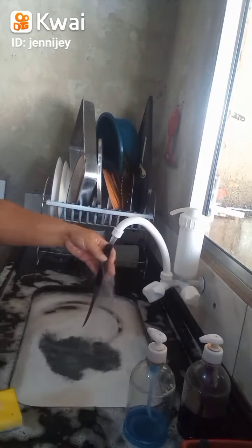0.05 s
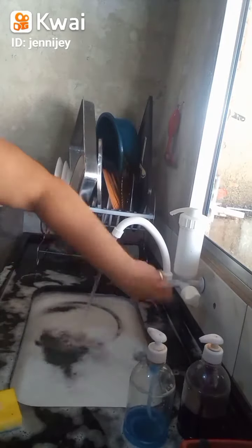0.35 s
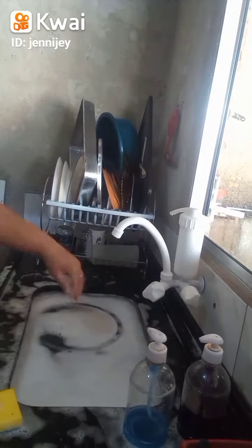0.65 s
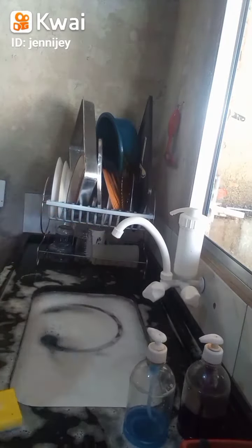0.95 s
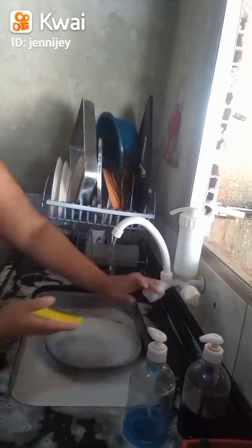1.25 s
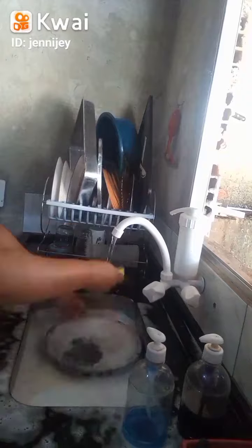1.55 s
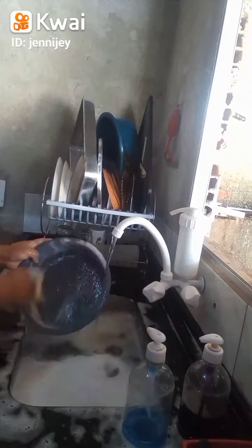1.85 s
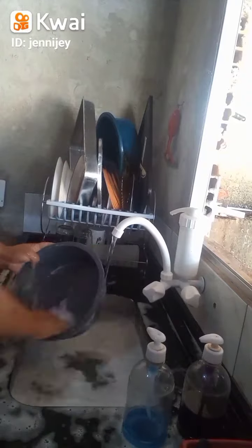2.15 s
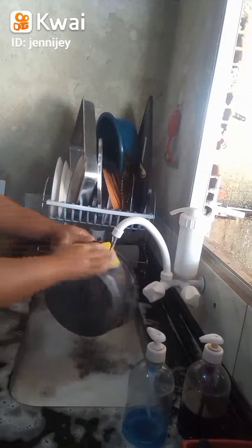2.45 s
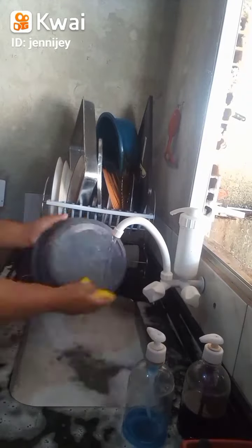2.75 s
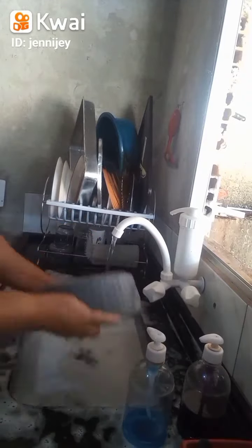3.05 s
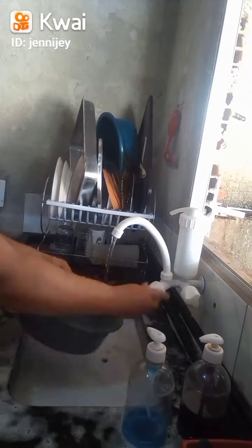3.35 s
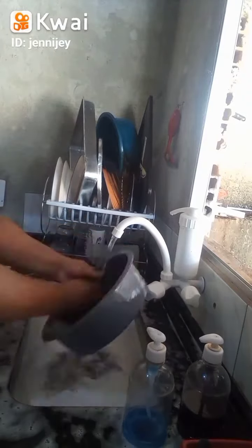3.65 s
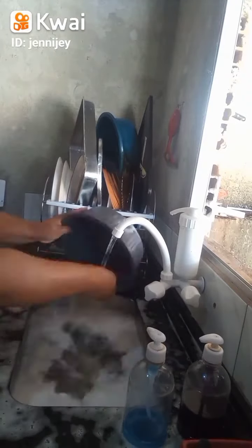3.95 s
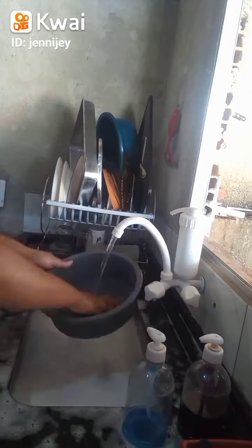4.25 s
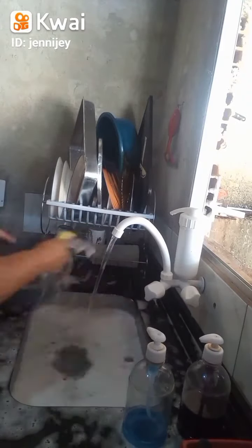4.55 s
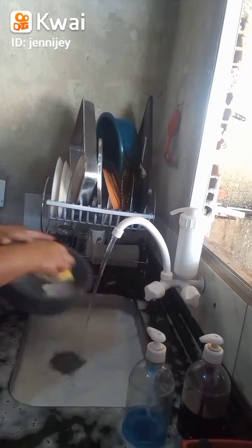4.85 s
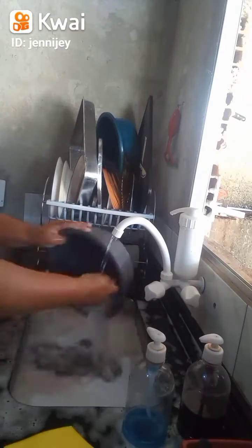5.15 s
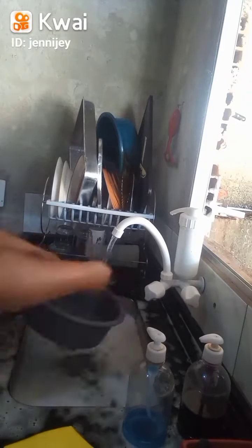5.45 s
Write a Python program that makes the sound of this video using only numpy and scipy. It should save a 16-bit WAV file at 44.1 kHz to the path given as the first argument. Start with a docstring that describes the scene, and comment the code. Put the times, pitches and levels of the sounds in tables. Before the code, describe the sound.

Close up at a kitchen sink, tap water runs and a knife clacks once. The tap shuts with a soft judder, and a plastic basin bumps into the sink. The water spurts back on and the basin is washed by hand: the stream sprays, gurgles and drums unevenly, with splashing handfuls, small plops, ticking drops and dull bumps.

```python
"""At a kitchen sink, a plastic basin is washed by hand under the tap, heard close up.
The stream sprays, gurgles and drums; handfuls of water splash down and drops tick. The water is
modelled as trapped air bubbles, each a damped oscillator, over the noise of froth.
Early on a knife clacks once, and the tap judders shut for a moment while the basin bumps into
the sink; these struck bodies ring in their normal modes."""
import sys
import numpy as np
from scipy import signal
from scipy.fft import rfft, irfft, next_fast_len
from scipy.io import wavfile
from scipy.ndimage import uniform_filter1d, map_coordinates

SR = 44100
rng = np.random.default_rng(int(sys.argv[2]) if len(sys.argv) > 2 else 0)


def wav_record(signal):
    """Record a signal, one row per channel, as 16-bit PCM in the file named by sys.argv[1]."""
    frames = np.transpose(np.atleast_2d(signal))
    bounded = np.clip(frames, -1, 1)
    # unit amplitude maps onto the largest positive 16-bit level
    quanta = np.round(bounded * 32767).astype(np.int16)
    wavfile.write(sys.argv[1], SR, quanta)


N = 250929
TIME = np.arange(N) / SR
HIT = np.arange(SR // 6) / SR  # time since a contact [s]

# Noise spectra: (frequency [Hz], relative spectral level [dB])
ROOM_SPECTRUM = [(50, -10.5), (140, -1.5), (400, -14), (2000, -26.5), (7500, -26)]  # the kitchen at rest
RUMBLE_SPECTRUM = [(25, -7.5), (45, -8.5), (80, -1.5), (115, -2), (170, -9)]
HISS_SPECTRUM = [(8500, -5.5), (11500, -6), (13300, 0.5), (14200, -10)]
SPURT_SPECTRUM = [(530, -58), (900, -28), (1180, -31), (1520, -16), (2690, -4), (6170, -4), (7800, -11),
                  (10100, -41), (17200, -120)]  # the tap opening
SPRAY_SPECTRUM = [(500, -35), (1200, -5.5), (1500, -7), (2050, 0), (2500, 1), (2950, -1), (3900, -1),
                  (4700, -5), (5400, -2), (5950, -1), (6700, -4), (7400, -10), (8000, -19)]  # fine droplets
GURGLE_SPECTRUM = [(200, -14), (380, -4), (520, -1), (780, -1), (920, -7), (1080, -5), (1230, -3),
                   (1450, -10), (1900, -10), (3000, -9)]  # pooled water
DRUM_SPECTRUM = [(20, -15), (45, -19), (80, -8.5), (125, -0.5), (200, 0), (300, -3), (420, -3),
                 (700, -27.5)]  # water pounding basin and sink
SLOSH_SPECTRUM = [(150, 5), (400, 2.5), (700, -2.5), (1300, -5.5), (2400, -12), (5000, -16.5), (7500, -22)]  # handfuls landing
# Envelopes: (time [s], relative level [dB])
RUMBLE_LEVELS = [(0, -66), (.5, -79.5), (.95, -60.5), (1.4, -71.5), (2.7, -66.5), (3.05, -62),
                 (4.15, -76.5), (4.55, -66.5), (5.0, -80), (5.69, -63)]
JET_LEVELS = [(0, -49.5), (.14, -47), (.44, -60.5), (.6, -54.5), (.71, -80), (1.0, -84.5), (1.07, -62.5),
              (1.26, -63), (1.33, -60), (1.6, -58.5), (1.97, -50), (2.55, -53.5), (2.87, -49),
              (3.08, -59.5), (3.3, -63), (3.78, -48.5), (4.08, -52.5), (4.33, -50), (4.85, -54.5),
              (5.14, -51.5), (5.42, -56.5), (5.69, -51.5)]  # the tap shuts near 0.7 s and opens again
# Contacts of solid bodies: (time [s], relative level [dB])
TAP_CONTACTS = [(.59, -48), (.604, -45), (.621, -43), (.642, -40.5), (.653, -38), (.667, -37), (.68, -40)]
BASIN_CONTACTS = [(.8358, -22), (.8425, -28.5), (.8475, -30.5), (.862, -33.5)]
KNIFE_CONTACTS = [(.2332, -24), (.2345, -13), (.2382, -19), (.2415, -24)]
# Normal modes: (frequency [Hz], relative level [dB], 60 dB decay time [s])
PIPE_MODES = [(172, -2.5, 0.061), (350, -8, 0.054), (470, -3, 0.05), (665, -11.5, .05)]
SINK_MODES = [(111, -10.5, 0.086), (185, -7, 0.094), (255, -1, 0.037), (342, 2.5, 0.032), (506, -5, 0.059),
              (677, -11, 0.045), (800, -12, 0.042), (1120, -28, 0.037), (1350, -38.5, .04),
              (1570, -24, 0.045)]
KNIFE_MODES = [(296, -23.5, 0.022), (440, -11.5, 0.052), (1260, -17.5, 0.051), (1850, -15, 0.045),
               (1920, -10.5, 0.019), (2760, -16, 0.023), (3270, -18, 0.026), (3910, -14, 0.023),
               (4340, -6.5, 0.022), (4660, -7, 0.021), (5440, -17, 0.035), (6000, -7.5, .025),
               (6370, -16, 0.03), (6920, -7, 0.018)]
# Single resonances: (time [s], relative level [dB], frequency [Hz])
BASIN_BUMPS = [(1.574, -36, 186), (1.62, -30.5, 350), (1.741, -29.5, 212), (1.944, -29, 262),
               (2.04, -29, 253), (2.597, -30, 332), (3.923, -25.5, 293), (3.971, -32, 196),
               (4.45, -32.5, 215), (4.611, -24.5, 261), (5.217, -36, 199)]  # hands and water on the basin
AIR_POCKETS = [(.103, -33.5, 791), (.159, -43, 1110), (1.622, -39.5, 568), (1.801, -36, 640),
               (1.82, -42, 1100), (1.91, -32, 790), (1.977, -36, 423), (2.046, -32, 493), (2.118, -36, 720),
               (2.227, -33.5, 930), (2.327, -34, 1220), (2.342, -33.5, 786), (2.423, -36.5, 703),
               (2.976, -38.5, 1010), (3.133, -37.5, 765), (3.179, -39.5, 930), (3.221, -43.5, 729),
               (3.291, -42, 1210), (3.504, -37, 515), (3.621, -28, 784), (3.81, -33.5, 1220),
               (4.109, -41.5, 890), (4.223, -25.5, 588), (4.551, -32, 536), (4.577, -30, 685),
               (4.709, -35, 754), (5.216, -37.5, 597), (5.342, -36.5, 1220)]  # large bubbles closing
# A thin squirt as the hand reaches the tap: (time [s], frequency [Hz], level [dB])
SQUIRT_GLIDE = [(0.444, 870, -69), (0.46, 1000, -52), (.468, 1150, -63), (.484, 1040, -52),
                (0.493, 1405, -46), (.498, 2000, -49), (.505, 2500, -56), (.512, 2600, -78)]
# Drops hitting hard: (time [s], smack level [dB], frequency [Hz], ring over smack [dB])
DROP_IMPACTS = [(0.0333, -45.5, 2410, 14), (0.374, -38.5, 6330, 15), (1.4697, -49, 2050, 3),
                (1.9297, -41.5, 4020, 16), (2.0867, -38, 1876, 6), (2.7703, -48, 3920, 19),
                (2.825, -50, 2410, 23.5), (2.944, -50, 2330, 21), (2.9779, -45.5, 2300, -7),
                (3.321, -53, 5200, 15), (3.3436, -56.5, 2030, 17.5), (3.4386, -49.5, 5870, 6),
                (4.0112, -40, 2700, -8), (4.1774, -45.5, 2250, 0), (4.279, -47, 2070, 0),
                (4.2954, -43, 5700, 14), (4.7088, -48.5, 3790, 16), (5.016, -45, 2150, 0),
                (5.0662, -51.5, 3600, 24), (5.2175, -43.5, 1594, 11), (5.296, -49, 3460, 18),
                (5.3424, -42.5, 1850, 10), (5.436, -45.5, 3920, 16.5), (5.5054, -42.5, 5870, 15),
                (5.6, -45.5, 2600, 2)]
# Handfuls landing: (peak time [s], rise width [s], spray level [dB], slosh level [dB])
HANDFULS = [(.07, 0.0049, -36.5, -37), (.219, 0.0054, -40, -47), (0.28, 0.0044, -40, -60),
            (.32, 0.006, -43.5, -45), (.352, 0.0067, -47, -52), (0.395, 0.0049, -46, -59),
            (0.535, 0.0078, -38.5, -72), (0.672, 0.0052, -42, -45), (.748, 0.005, -68, -77),
            (.826, 0.0041, -63, -74), (.87, 0.0043, -47, -50), (.938, 0.0049, -59, -73),
            (1.046, 0.0048, -55, -78.5), (1.141, 0.0072, -49.5, -58), (1.188, 0.0059, -45, -56),
            (1.649, 0.0067, -38, -45), (2.001, 0.0041, -40.5, -48), (2.12, 0.0052, -62, -41),
            (2.168, 0.016, -42.5, -51), (2.3, 0.017, -41, -63), (2.464, 0.0041, -38, -60),
            (2.512, .005, -48, -62), (2.603, 0.0057, -43, -44.5), (2.66, 0.017, -45.5, -63),
            (3.041, 0.0074, -47, -75), (3.407, 0.0072, -53, -47), (3.511, 0.0048, -46, -44.5),
            (3.68, 0.011, -44, -52), (3.952, 0.0063, -44.5, -42.5), (4.233, 0.0041, -42, -44),
            (4.429, 0.01, -40, -44.5), (4.573, 0.0052, -40, -36.5), (5.066, 0.0087, -46.5, -50.5),
            (5.299, 0.0047, -45, -63), (5.555, 0.0046, -42.5, -50), (5.645, .013, -43, -47)]
# Sheets pouring off the tilted basin: (start [s], length [s], gurgle level [dB], drum level [dB])
POURED_SHEETS = [(0.039, 0.051, -49.5, -51), (0.306, 0.12, -55.5, -58), (1.372, 0.17, -53.5, -59),
                 (1.585, 0.15, -59, -54), (1.729, 0.11, -46.5, -51), (1.888, .16, -46.5, -49.5),
                 (2.075, .08, -50.5, -60), (2.241, 0.21, -51.5, -52), (2.595, 0.1, -49.5, -54),
                 (2.715, 0.23, -51.5, -51.5), (3.116, 0.25, -59.5, -67), (3.481, 0.051, -61, -50),
                 (3.657, 0.201, -50.5, -57), (3.914, .085, -56.5, -48), (4.386, .1, -49, -49),
                 (4.555, .325, -50, -50), (5.05, 0.064, -52.5, -71), (5.165, 0.058, -50, -56.5),
                 (5.31, 0.077, -56, -61), (5.612, 0.046, -46.5, -64)]
# A hand or the sponge catches the stream: (time [s])
CATCH_TIMES = [.264, .298, .635, 1.255, 1.57, 1.975, 2.06, 2.44, 2.565, 3.09, 3.275, 3.37, 3.622, 3.737,
               4.085, 4.16, 4.69, 4.92, 5.037, 5.272, 5.405, 5.585]


def amp(db):
    """The decibel scale: 20 dB is a factor of ten in amplitude."""
    return 10 ** (np.asarray(db) / 20)


def unit(x):
    """Normalisation to rms 1."""
    return x / np.sqrt(np.mean(x ** 2) + 1e-20)


def filtered(x, response):
    """Linear filtering: the spectrum is multiplied by a frequency response."""
    size = next_fast_len(len(x) + SR // 4)
    return irfft(rfft(x, size) * response(np.fft.rfftfreq(size, 1 / SR)), size)[:len(x)]


def coloured(x, spectrum):
    """Spectral shaping on a log frequency axis, falling away beyond the table's ends; rms 1."""
    knots, db = np.transpose([(spectrum[0][0] / 2, -60), *spectrum, (spectrum[-1][0] * 2, -90)])
    return unit(filtered(x, lambda hz: amp(np.interp(np.log(hz + 1), np.log(knots), db))))


def noise(spectrum, size=N):
    """Source and filter: white noise takes on the given spectrum."""
    return coloured(rng.standard_normal(size), spectrum)


def wobble(rate):
    """Random modulation: a smooth curve through `rate` random values a second."""
    return map_coordinates(rng.standard_normal(int(N * rate / SR) + 4), [TIME * rate])


def fade(t, t60):
    """Exponential damping: 60 dB of decay in t60."""
    return np.exp(-np.log(1000) * t / t60)


def add(track, start, sound):
    """Superposition: a sound joins the track at start [s]."""
    part = track[max(round(start * SR), 0):][:len(sound)]
    part += sound[:len(part)]


def resonance(t, hz, cycles, rise, onset_cycles):
    """A damped oscillator, 60 dB down after `cycles`; `rise` lifts the pitch, as in a surfacing bubble."""
    age = t * hz / cycles
    phase = 2 * np.pi * hz * t * (1 + rise * np.minimum(age, 2) / 2)
    return np.sin(phase) * fade(age, 1) * (1 - np.exp(-t * hz / onset_cycles))


def smack(hz, octaves, t60):
    """A brief wet impact has a broad spectrum: decaying noise centred on hz."""
    hump = lambda f: 1 / (1 + (np.log2((f + 1) / hz) / octaves) ** 2)
    return unit(filtered(rng.standard_normal(len(HIT)), hump)) * fade(HIT, t60)


def background():
    """Ambient noise: the still kitchen and a faint, uneven rumble."""
    rumble_db = np.interp(TIME, *np.transpose(RUMBLE_LEVELS)) - 2
    return amp(rumble_db) * noise(RUMBLE_SPECTRUM) + amp(-79.5) * noise(ROOM_SPECTRUM)


def struck(contacts, modes, scrape_gain, scrape_t60, spectrum):
    """Modal superposition: each contact excites the modes at new strengths, with a scrape of noise."""
    out = np.zeros(N)
    attack = 1 - np.exp(-HIT / 0.00015)
    for start, db in contacts:
        ring = np.zeros(len(HIT))
        for k, (hz, mode_db, t60) in enumerate(modes):
            gain = (-1) ** k * amp(mode_db + rng.normal(0, 1))
            ring += gain * fade(HIT, t60) * np.sin(2 * np.pi * hz * HIT)
        scrape = scrape_gain * noise(spectrum, len(HIT)) * fade(HIT, scrape_t60)
        add(out, start, amp(db) * (ring + scrape) * attack)
    return out


def tap_judder():
    """Repeated impulses from the closing tap excite the modes of its pipe."""
    return struck(TAP_CONTACTS, PIPE_MODES, scrape_gain=0.23, scrape_t60=0.04, spectrum=DRUM_SPECTRUM)


def basin_landing():
    """Impact excitation: the basin lands and rocks, sounding the low modes of the sink."""
    return struck(BASIN_CONTACTS, SINK_MODES, scrape_gain=0.29, scrape_t60=0.078, spectrum=SLOSH_SPECTRUM)


def knife_clack():
    """Temporal fusion: contacts milliseconds apart ring the knife and are heard as one clack."""
    return struck(KNIFE_CONTACTS, KNIFE_MODES, scrape_gain=0.48, scrape_t60=0.028,
                  spectrum=SPRAY_SPECTRUM)


def bumps():
    """Heavy damping: the hand-held basin gives only a few low cycles and a dull wet slap."""
    out = np.zeros(N)
    for start, db, hz in BASIN_BUMPS:
        slap = smack(hz * 1.5, octaves=1, t60=0.11) * (1 - np.exp(-HIT / 0.0038))
        thud = resonance(HIT, hz, cycles=9.4, rise=0, onset_cycles=1)
        add(out, start, amp(db) * (1.8 * thud + 0.37 * slap))
    return out


def squirt():
    """Resonant frequency rises as an air pocket shrinks: it sings unsteadily upwards."""
    times, hz, db = np.transpose(SQUIRT_GLIDE)
    pitch = np.interp(TIME, times, hz) * (1 + 0.08 * wobble(400))
    level = np.interp(TIME, times, amp(db), left=0, right=0) * amp(2.5 * wobble(300))
    return level * np.sin(2 * np.pi * np.cumsum(pitch) / SR)


def plops():
    """Large bubbles resonate low: each closes in the pooled water with a soft splat."""
    out = np.zeros(N)
    for start, db, hz in AIR_POCKETS:
        splat = 0.055 * smack(hz, octaves=0.87, t60=0.06)
        ring = resonance(HIT, hz, cycles=17.2, rise=0.031, onset_cycles=2.7)
        add(out, start, amp(db + 8.5) * (ring + splat))
    return out


def drops():
    """Air entrainment: a drop smacks the wet plastic, traps one small bubble and scatters into mist."""
    out = np.zeros(N)
    for start, db, hz, ring_db in DROP_IMPACTS:
        mist = 1.21 * noise(SPRAY_SPECTRUM, len(HIT)) * fade(HIT, 0.038)
        impact = smack(hz, octaves=0.36, t60=0.042)
        ring = amp(ring_db) * resonance(HIT, hz, cycles=62, rise=0.013, onset_cycles=7.3)
        add(out, start, amp(db) * (impact + mist + ring))
    return out


def gush(start, length, attack_s=0.011, release_s=0.012):
    """Amplitude envelope of a run of water: linear attack, hold, exponential release."""
    age = TIME - start
    return np.clip(age / attack_s, 0, 1) * np.exp(-np.maximum(age - length, 0) / release_s)


def spurt():
    """A noise transient: air and water spit from the spout as the tap opens."""
    return amp(-39.5) * gush(start=1.339, length=0.044) * noise(SPURT_SPECTRUM)


def bubbles(per_s, band_hz, cycles, rise, samples, spread_db=3.5):
    """Incoherent summation: bubbles ring at random times, pitches and strengths."""
    low_hz, high_hz = band_hz
    when, pitch, strength, life = rng.random((int(per_s * N / SR), 4)).T[:, :, None]
    hz = low_hz * (high_hz / low_hz) ** pitch
    gain = amp(-spread_db * np.log(strength + 0.054)) * hz / low_hz
    rings = gain * resonance(np.arange(samples) / SR, hz, cycles * (0.5 + life), rise, cycles / 20)
    positions = (when * N).astype(int) + np.arange(samples)
    return np.bincount(positions.ravel(), rings.ravel(), N)[:N]


def hollowed(x, depth_db=2.4):
    """Interference of echoes in the turning basin, imitated by random gains in shifting narrow bands."""
    spectra = signal.stft(x, nperseg=1024)[2]
    ripple = uniform_filter1d(rng.standard_normal(spectra.shape), size=3, axis=0)  # over frequency
    ripple = uniform_filter1d(ripple, size=12, axis=1)  # over time
    return signal.istft(spectra * amp(depth_db * unit(ripple)), nperseg=1024)[1][:N]


def water(cloud, spectrum, froth_db, flutter_db):
    """Modulated noise: bubbles and froth flutter as the flow breaks up, while mean power stays steady."""
    froth = amp(froth_db) * rng.standard_normal(N)
    texture = hollowed(coloured(unit(cloud) + froth, spectrum)) * amp(flutter_db * wobble(90))
    running_power = np.abs(uniform_filter1d(texture ** 2, size=1200))
    return texture / np.sqrt(running_power + 1e-9)


def splashes():
    """Bubble resonance in bursts: each handful breaks into a swell of droplets over a duller slosh."""
    spray, slosh = np.zeros(N), np.zeros(N)
    for peak, rise_s, spray_db, slosh_db in HANDFULS:
        width = np.where(TIME < peak, rise_s, rise_s * 1.09)  # the fall is slightly slower
        swell = np.exp(1 - np.hypot((TIME - peak) / width, 1))
        spray += amp(spray_db) * swell
        slosh += amp(slosh_db) * swell
    small = bubbles(per_s=2000, band_hz=(1500, 8000), cycles=26, rise=0.03, samples=700)
    droplets = water(small, SPRAY_SPECTRUM, froth_db=4, flutter_db=0.5)
    large = bubbles(per_s=600, band_hz=(350, 2800), cycles=12, rise=0.06, samples=1600, spread_db=4)
    pool = water(large, SLOSH_SPECTRUM, froth_db=2, flutter_db=0.5)
    return spray * droplets + slosh * pool


def stream(sway_db=1, catch_width_s=0.014, catch_depth_db=7):
    """Incoherent sources add in power: jet and pours both feed the spray, gurgling and drumming."""
    jet_db = np.interp(TIME, *np.transpose(JET_LEVELS))
    jet = amp(jet_db + sway_db * wobble(28))  # the jet wanders over the basin
    poured, pounding = np.zeros(N), np.zeros(N)
    for start, length, gurgle_db, drum_db in POURED_SHEETS:
        sheet = gush(start, length)
        poured += amp(gurgle_db) * sheet
        pounding += amp(drum_db) * sheet
    spray = np.hypot(amp(-1) * jet, amp(-8) * poured)
    gurgle = np.hypot(amp(-5.5) * jet, poured)
    drum = np.hypot(amp(-15.5) * jet, pounding)

    small = bubbles(per_s=1600, band_hz=(1400, 8000), cycles=28, rise=0.03, samples=800)
    fizz = water(small, SPRAY_SPECTRUM, froth_db=5.5, flutter_db=0.9)
    large = bubbles(per_s=420, band_hz=(400, 2000), cycles=14, rise=0.04, samples=1800)
    pool = water(large, GURGLE_SPECTRUM, froth_db=2, flutter_db=0.6)
    thuds = bubbles(per_s=170, band_hz=(103, 504), cycles=6.1, rise=0, samples=3000, spread_db=3.3)
    floor = water(thuds, DRUM_SPECTRUM, froth_db=8, flutter_db=3)
    caught = sum(np.exp(-((TIME - when) / catch_width_s) ** 2) for when in CATCH_TIMES)
    return amp(-catch_depth_db * caught) * (spray * fizz + gurgle * pool + drum * floor)


def scene():
    """Superposition of direct sound: knife, basin, tap and water over the quiet kitchen."""
    solids = amp(-0.5) * knife_clack() + amp(-2.5) * basin_landing() + tap_judder()
    wet = stream() + spurt() + splashes() + drops() + plops() + squirt()
    return (solids + wet + bumps() + background())[None]


def record(dry, cutoff_hz=7900, hiss_top_hz=14200):
    """Band limiting: a steep low-pass cuts the scene's top, and only a faint hiss lies above it."""
    hiss = amp(-95) * noise(HISS_SPECTRUM)
    band = filtered(dry[0], lambda hz: 1 / np.sqrt(1 + (hz / cutoff_hz) ** 90))
    return filtered(band + hiss, lambda hz: hz < hiss_top_hz)[None]


dry = scene()
out = record(dry)
wav_record(out)
```